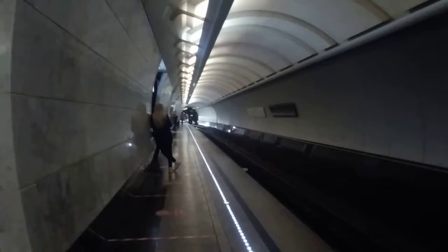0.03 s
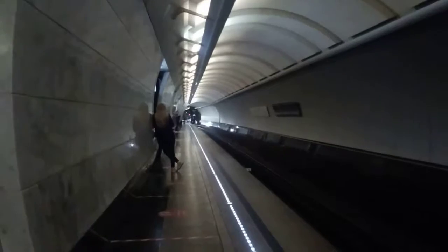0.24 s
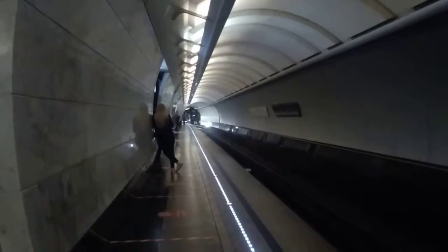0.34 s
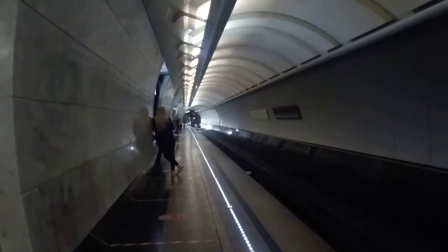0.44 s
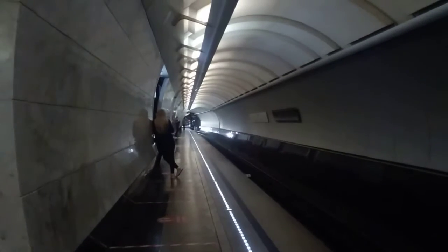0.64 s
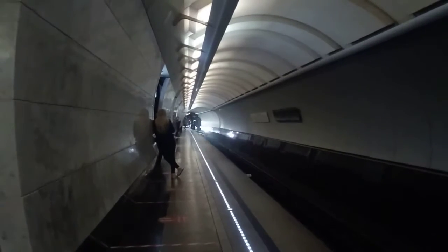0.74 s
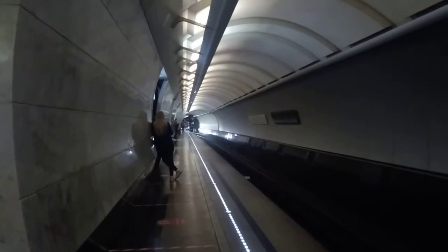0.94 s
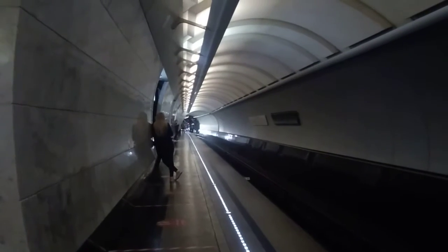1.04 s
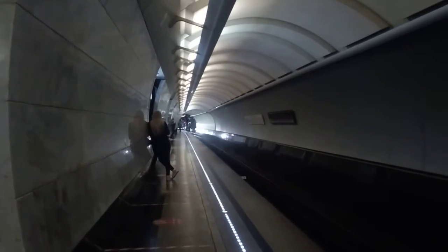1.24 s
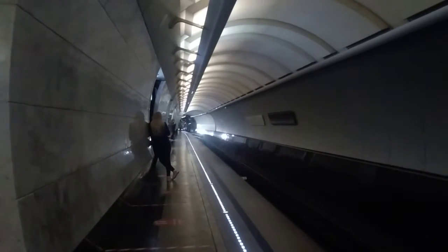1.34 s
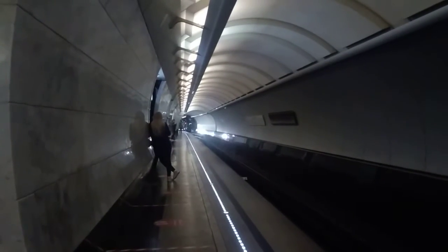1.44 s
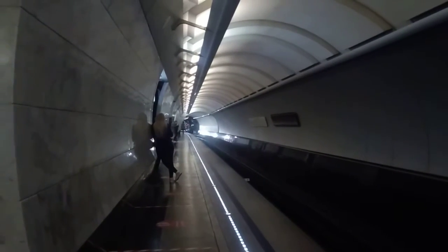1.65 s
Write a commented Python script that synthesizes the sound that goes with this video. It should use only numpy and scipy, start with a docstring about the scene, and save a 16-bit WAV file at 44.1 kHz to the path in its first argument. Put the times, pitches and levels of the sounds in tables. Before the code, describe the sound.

A distant underground train is heard from the platform, its rushing noise swelling by 0.4 seconds with hollow ringing tones and a deep tunnel rumble. The rush grows duller as the rails sing very faintly, then drops abruptly at 1.1 seconds with a few small ticks. A low boom follows near 1.3 seconds. A quieter low roar remains, with a dull knock at about 1.6 seconds.

```python
"""On the platform of a vaulted station, a metro train is heard from far down the tunnel.
The train's loud rushing noise fills the station for a second, with hollow tones ringing in it,
grows duller, then is abruptly turned down. The air in the tunnel rumbles deeply.
The train's low roar stays, blurred by the vault. Around it come short hollow swells,
one more boom, thin singing rails, a few ticks and dull knocks."""
import sys
import numpy as np
from scipy import signal
from scipy.fft import rfft, irfft
from scipy.io import wavfile
from scipy.ndimage import uniform_filter1d

SR = 44100
rng = np.random.default_rng(int(sys.argv[2]) if len(sys.argv) > 2 else 0)


def output_pcm(signal):
    """Save a mono or channel-first signal as 16-bit PCM at the path in sys.argv[1].

    Samples are clipped to [-1, 1] before scaling.
    """
    pcm = np.clip(np.atleast_2d(signal).T, -1, 1) * 32767
    wavfile.write(sys.argv[1], SR, np.round(pcm).astype(np.int16))


N = 74970

# The tone of the far train. Each row: frequency in Hz, relative level in dB.
TRAIN_TONE = [(60, -10), (130, 2), (240, 1.5), (320, -2), (400, -14.5), (500, -9.5), (690, -9.5),
              (860, -23.5), (1080, -15.5), (1320, -23), (1450, -18.5), (1900, -25.5), (2800, -33),
              (4000, -37), (4600, -42.5), (5200, -41.5), (7000, -55), (7900, -52), (8700, -65.5),
              (14000, -66)]
# How loud the far train's lasting roar is. Each row: time in seconds, level in dB.
TRAIN_LOUDNESS = [(.12, -46), (1.15, -40.5), (1.38, -41), (1.58, -43.5), (1.7, -40.5)]
# The singing rails. Each row: start and end in seconds, pitch in Hz, width in Hz, level in dB.
RAIL_NOTES = [(0.64, 1.124, 7590, 270, -70.5), (.9, 1.09, 10060, 200, -83), (.66, 1.8, 7520, 70, -92)]
# Small bright ticks. Each row: time in seconds, level in dB.
TICK_TIMES = [(1.073, -48.5), (1.085, -55), (1.132, -62), (1.152, -65)]
# Dull knocks. Each row: start in seconds, level in dB.
KNOCK_TIMES = [(0.167, -36.5), (1.609, -30.5)]
# The tones in a knock. Each row: pitch in Hz, relative level in dB, seconds to fade by 60 dB.
KNOCK_TONES = [(207, 3, 0.046), (255.6, 6.5, .06), (335, -19, .035)]
# Hollow swells. Each row: peak time and half length in seconds, pitch and width in Hz, level in dB.
HOLLOW_SWELLS = [(0.352, 0.034, 1107, 60, -36.5), (0.447, .045, 4000, 150, -43.5),
                 (0.63, 0.033, 274, 60, -28), (1.012, 0.032, 1050, 70, -39.5),
                 (1.017, .035, 1424, 70, -43.5), (1.1, 0.039, 571, 130, -37.5),
                 (1.246, 0.03, 133, 50, -39.5), (1.273, 0.054, 630, 90, -47.5),
                 (1.383, 0.024, 493, 80, -42), (1.481, 0.033, 525, 120, -47.5),
                 (1.562, 0.037, 207, 40, -41.5)]
# The tone of the tunnel's rumbling air. Each row: frequency in Hz, relative level in dB.
RUMBLE_TONE = [(20, -27), (40, -23.5), (53, -8), (70, -0.5), (96, -7.5), (118, -16), (170, -34)]
# How loud the rumble is. Each row: time in seconds, level in dB.
RUMBLE_LOUDNESS = [(.12, -55), (.18, -40), (.225, -53), (.265, -31.5), (.39, -25), (.48, -30), (.565, -24),
                   (.72, -27.5), (.76, -29.5), (.915, -23.5), (.98, -40.5), (1.035, -29.5), (1.12, -43.5),
                   (1.19, -38), (1.37, -50), (1.44, -44.5), (1.57, -49), (1.7, -43.5)]
# The tone of the low roar under the rushing noise. Each row: frequency in Hz, relative level in dB.
ROAR_TONE = [(70, -32.5), (105, -9), (135, 0.5), (175, 0.5), (260, -1), (315, -3.5), (370, -14), (480, -34)]
# The tone of the train's rushing noise. Each row: frequency in Hz, relative level in dB.
RUSH_TONE = [(300, -20.5), (420, -4.5), (560, 0.5), (730, -1.5), (880, -7), (1150, -5.5), (1280, -7.5),
             (1600, -9.5), (2200, -6), (2700, -11), (3300, -12), (4500, -19.5), (5400, -22), (6800, -32.5),
             (8300, -41.5), (9300, -51.5), (14000, -58.5)]
# How loud the rushing noise is. Each row: time in seconds, relative level in dB.
RUSH_LOUDNESS = [(.12, -24.5), (.2, -10), (.3, -4.5), (.4, 0.5), (.62, 0), (.8, 0), (.96, 1.5), (1.04, 2),
                 (1.08, -6.5), (1.12, -15.5), (1.2, -41)]
# Hollow, steady tones that ring in the train's rushing noise.
# Each row: pitch in Hz, width in Hz, relative level in dB, fading in dB per second.
RUSH_HOLLOWS = [(1088, 78, -40, 9), (1418, 40, -45, 9.5), (1800, 40, -49, 14.5), (2070, 160, -42, 20),
                (2964, 58, -53, 12), (3990, 110, -47, 24), (5045, 89, -54.5, 23.5), (6140, 100, -59, 35),
                (8270, 90, -74.5, 27)]


def undb(db):
    """Turn decibels into a number to multiply by."""
    return 10 ** (np.asarray(db) / 20)


def clock():
    """The time of every sample in seconds."""
    return np.arange(N) / SR


def curve(rows):
    """A volume that glides between (seconds, dB) points."""
    return undb(np.interp(clock(), *np.array(rows).T))


def noise(gain):
    """Noise of strength 1, where gain(hz) sets the share of each frequency."""
    hz = np.maximum(np.fft.rfftfreq(N, 1 / SR), 1)
    x = irfft(rfft(rng.standard_normal(N)) * gain(hz), N)
    return x / x.std()


def shaped_noise(points):
    """Noise whose tone follows (Hz, dB) points and falls steeply beyond the ends."""
    freqs, db = np.array(points).T
    ends = lambda hz: np.minimum(hz / freqs[0], 1) ** 2 * np.minimum(freqs[-1] / hz, 1) ** 2
    return noise(lambda hz: undb(np.interp(np.log(hz), np.log(freqs), db)) * ends(hz))


def ringing(pitch_hz, width_hz):
    """Noise that rings around one pitch; the narrower it is, the clearer the note."""
    return noise(lambda hz: 1 / (1 + 2 * ((hz - pitch_hz ** 2 / hz) / (2 * width_hz)) ** 2))


def wobble(rate_hz):
    """A random drift of about 1 either way, mostly slower than rate_hz."""
    return noise(lambda hz: 1 / (1 + (hz / rate_hz) ** 2))


def steadied(x, span_s):
    """The same noise with its slow ups and downs in loudness evened out."""
    power = uniform_filter1d(x ** 2, int(span_s * SR), mode="wrap")
    return x / np.sqrt(power + 1e-9)


def far_train(waver_db=1.5):
    """The far train, blurred by the vault into a wavering low roar."""
    wavering = shaped_noise(TRAIN_TONE) * undb(waver_db * wobble(32))
    return steadied(wavering, 0.08) * curve(TRAIN_LOUDNESS)


def rails(fade_s=.04):
    """The steel rails sing faint, high notes that come and go."""
    t = clock()
    out = np.zeros(N)
    for start, end, hz, width, db in RAIL_NOTES:
        fade = np.clip(np.minimum(t - start, end - t) / fade_s + .5, 0, 1)
        out += ringing(hz, width) * undb(db) * fade
    return out


def ticks(rise_s=0.00063, fall_s=0.0042):
    """A few bright ticks as the rushing noise is turned down."""
    t = clock()
    strength = np.zeros(N)
    for peak, db in TICK_TIMES:
        strength += undb(db) * np.exp(-np.maximum((t - peak) / fall_s, (peak - t) / rise_s))
    return strength * ringing(pitch_hz=5470, width_hz=800)


def knocks(rise_s=0.0026):
    """Soft blows set off a few low tones that die quickly."""
    out = np.zeros(N)
    for start, db in KNOCK_TIMES:
        age = np.maximum(clock() - start, 0)
        ring = sum(undb(tone_db - 60 * age / fade_s) * np.sin(2 * np.pi * hz * age)
                   for hz, tone_db, fade_s in KNOCK_TONES)
        out += undb(db) * ring * (1 - np.exp(-age / rise_s))
    return out


def swells():
    """Single hollow tones rise briefly out of the train's noise."""
    out = np.zeros(N)
    for peak, half_length, hz, width, db in HOLLOW_SWELLS:
        hump = np.exp(-((clock() - peak) / half_length) ** 2)
        out += steadied(ringing(hz, width), 0.045) * undb(db) * hump
    return out


def tunnel_rumble(boom_s=1.265, boom_half_s=0.038, boom_hz=69.2, boom_db=-26):
    """The long column of air in the tunnel heaves, and booms once more after the rushing noise."""
    pitch = boom_hz * (1 + 0.11 * wobble(25))
    phase = 2 * np.pi * np.cumsum(pitch) / SR
    hump = np.exp(-((clock() - boom_s) / boom_half_s) ** 2)
    boom = np.sqrt(2) * np.sin(phase) * hump * undb(boom_db)
    rumble = steadied(shaped_noise(RUMBLE_TONE), 0.065) * curve(RUMBLE_LOUDNESS)
    return rumble + boom


def train_roar_and_hiss(lag_s=0.0057, flutter_db=1.5):
    """The low roar and finest hiss of the train's rushing noise follow its loudness a little late."""
    loudness = np.interp(clock() - lag_s, clock(), curve(RUSH_LOUDNESS))
    fluttering = shaped_noise(ROAR_TONE) * undb(flutter_db * wobble(33))
    roar = steadied(fluttering, .08) * undb(-28)
    hiss = shaped_noise([(8800, -1), (14000, -4)]) * undb(-81)
    return (roar + hiss) * loudness


def train_rush(treble_hz=1380, hollows_fade_from_s=0.39, flutter_db=0.82):
    """The train's rushing noise, with hollow tones in it, grows duller and is abruptly turned down."""
    before = np.maximum(hollows_fade_from_s - clock(), 0)
    after = np.maximum(clock() - hollows_fade_from_s, 0)
    rush = shaped_noise(RUSH_TONE) * undb(-34)
    freqs = np.fft.rfftfreq(N, 1 / SR)
    lows = irfft(rfft(rush) / (1 + (freqs / treble_hz) ** 4), N)
    treble_db = 15.5 * before - 15 * after  # sinks about 15 dB each second
    rush = lows + (rush - lows) * undb(treble_db)
    for hz, width, db, fading in RUSH_HOLLOWS:
        rush += steadied(ringing(hz, width), .12) * undb(db - fading * after)
    flutter = undb(flutter_db * steadied(wobble(60), .2))
    return rush * curve(RUSH_LOUDNESS) * flutter


def scene():
    """Everything heard from the platform, added into one channel."""
    loud_part = train_rush() + train_roar_and_hiss() + tunnel_rumble()
    return (loud_part + far_train() + swells() + rails() + ticks() + knocks())[None]


def record(dry):
    """Start after a short silence, fade both ends quickly and cut the highest treble."""
    start_s, fade_in_s, fade_out_s, top_hz = .115, .003, .004, 14200
    t = clock()
    fade = np.clip(np.minimum((t - start_s) / fade_in_s, (t[-1] - t) / fade_out_s), 0, 1)
    treble_cut = signal.ellip(8, .2, 70, top_hz, fs=SR, output="sos")
    return signal.sosfilt(treble_cut, dry * fade)


dry = scene()
out = record(dry)
output_pcm(out)
```